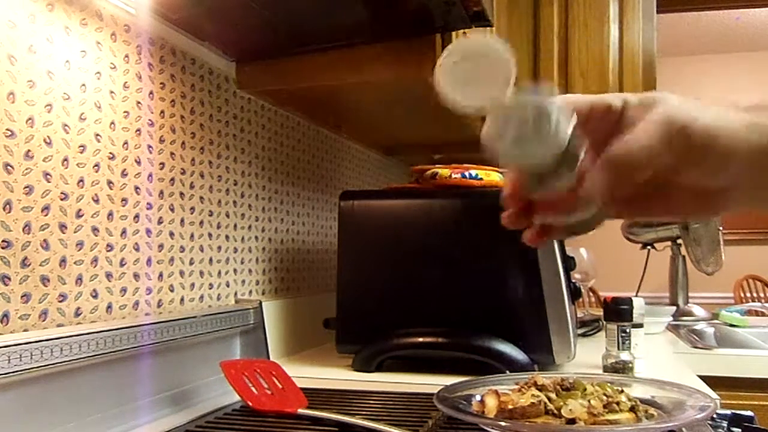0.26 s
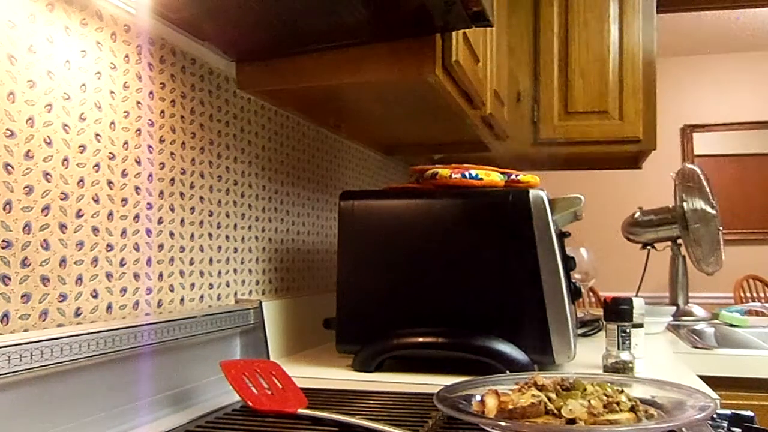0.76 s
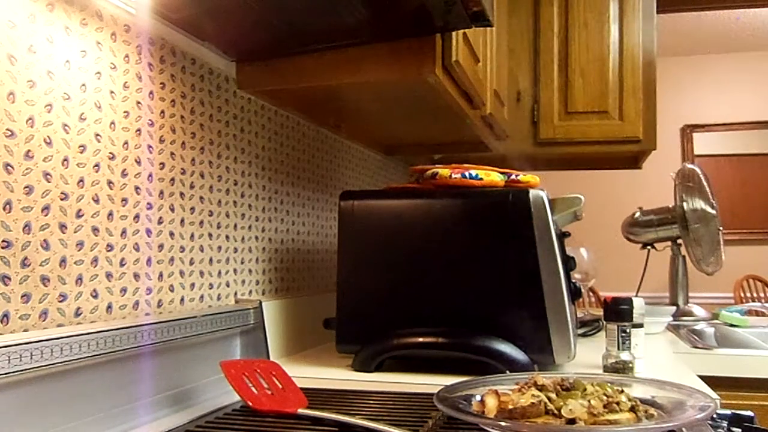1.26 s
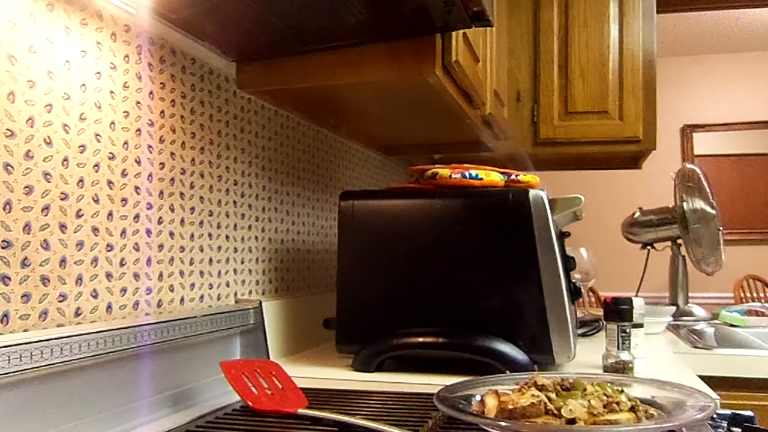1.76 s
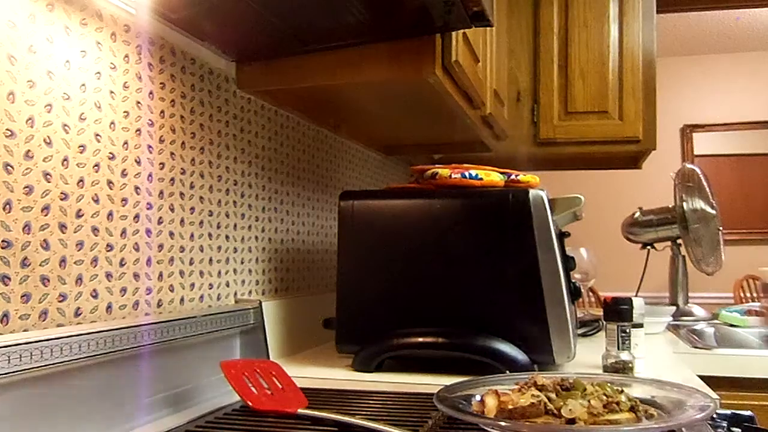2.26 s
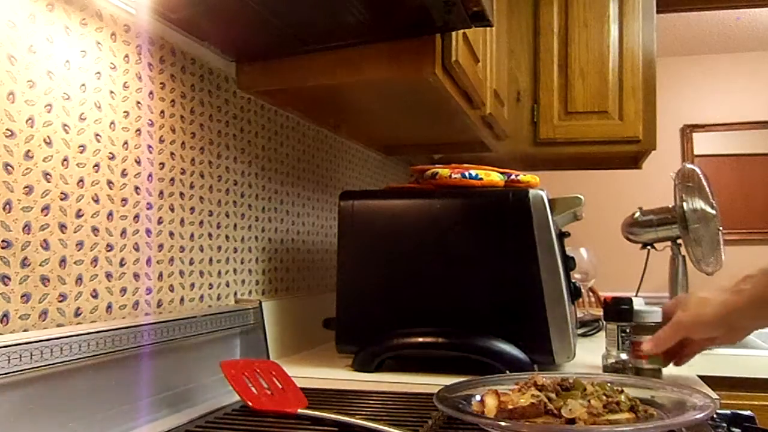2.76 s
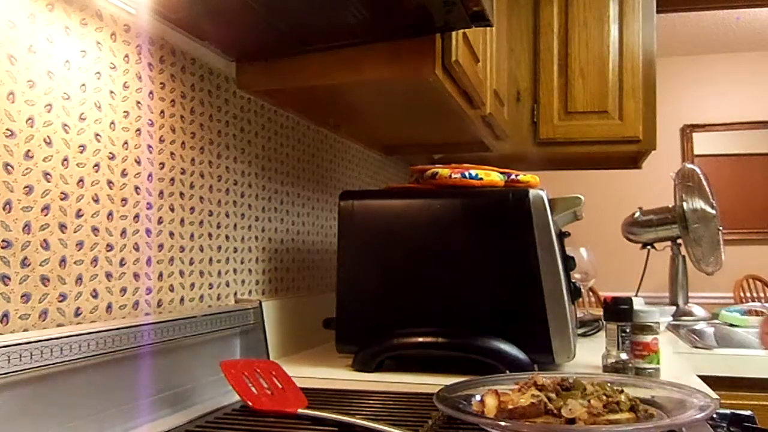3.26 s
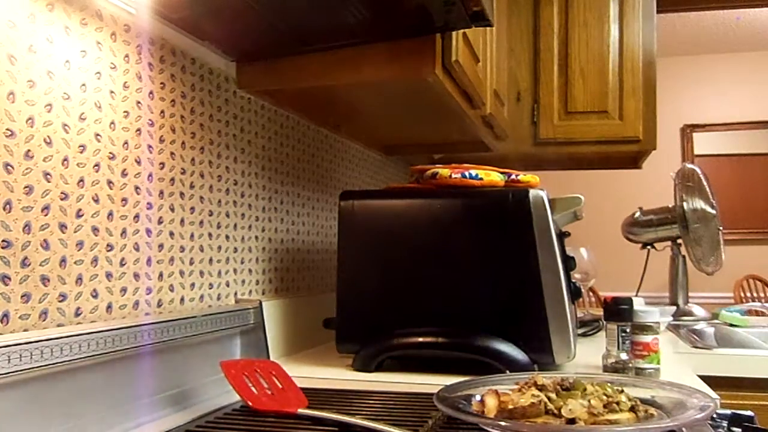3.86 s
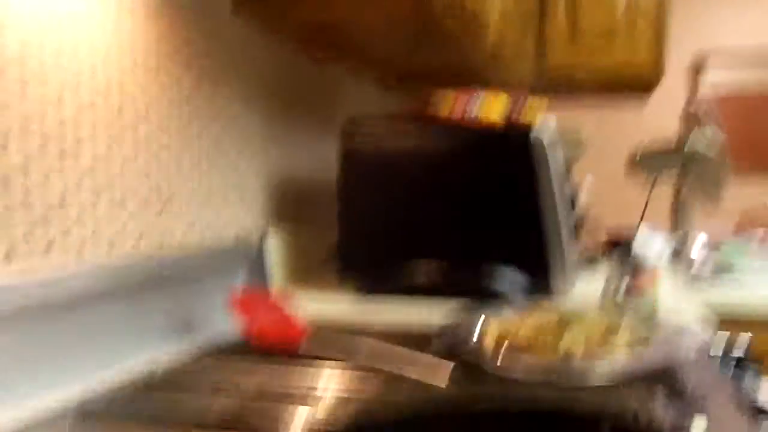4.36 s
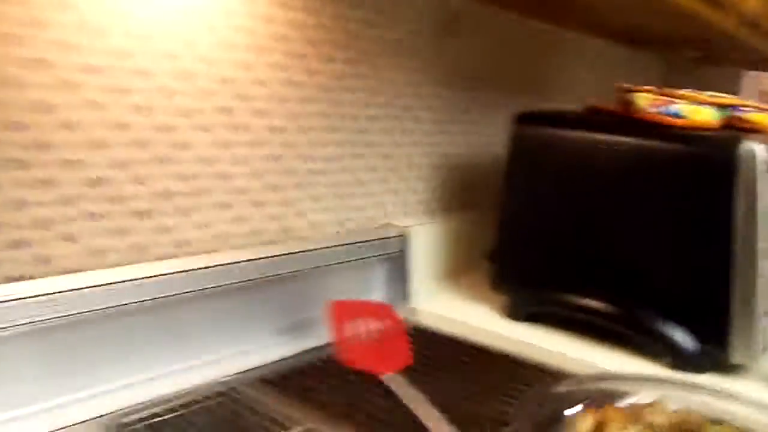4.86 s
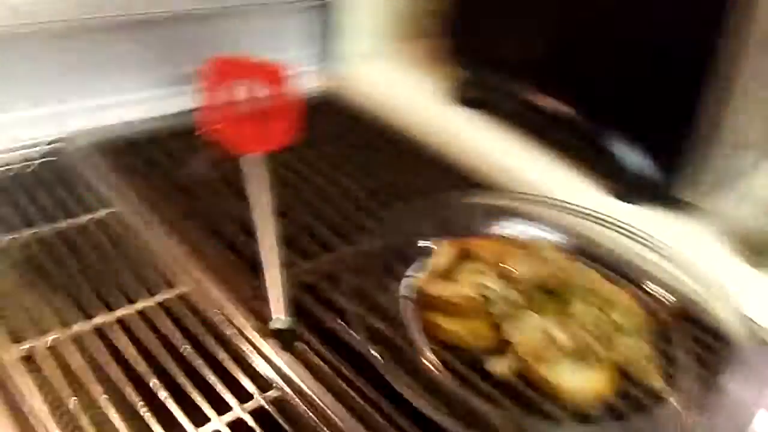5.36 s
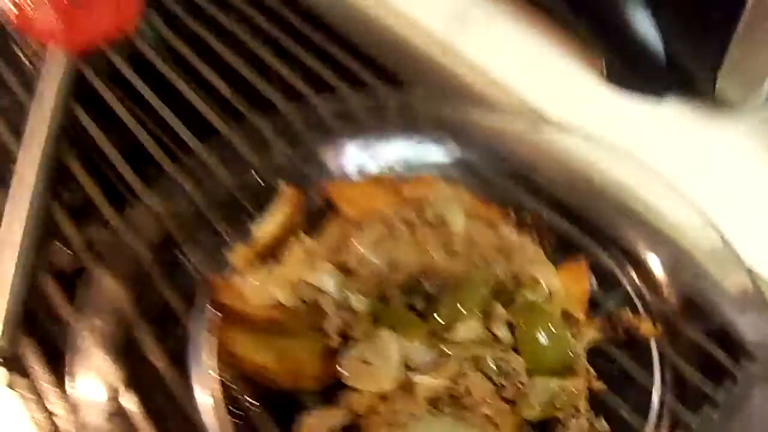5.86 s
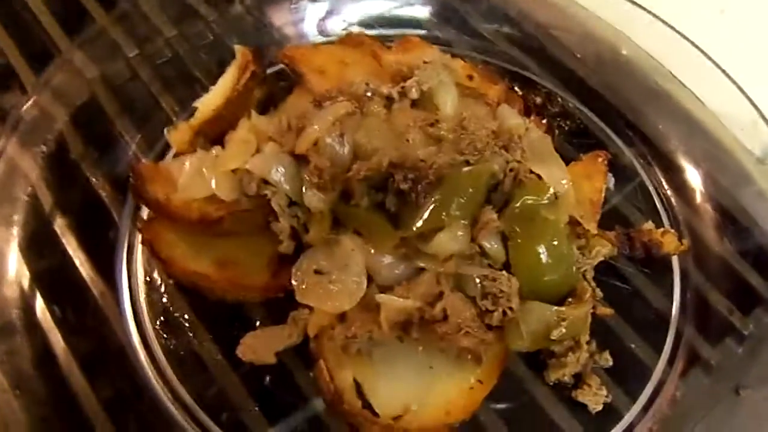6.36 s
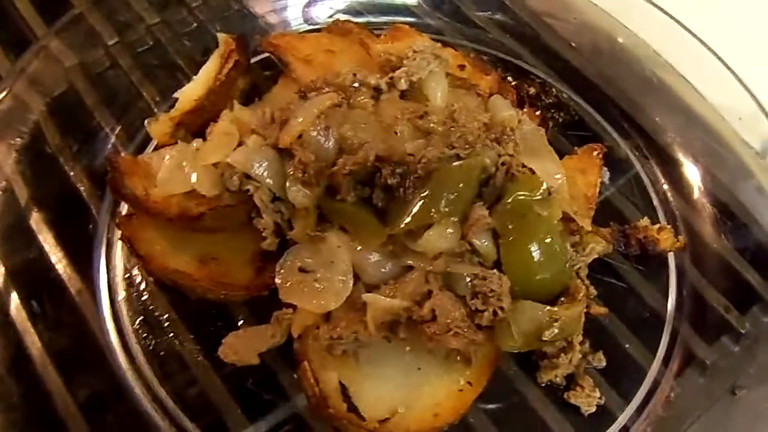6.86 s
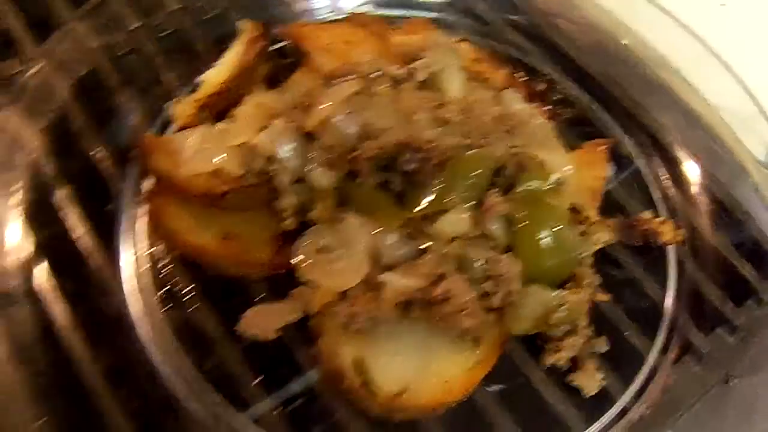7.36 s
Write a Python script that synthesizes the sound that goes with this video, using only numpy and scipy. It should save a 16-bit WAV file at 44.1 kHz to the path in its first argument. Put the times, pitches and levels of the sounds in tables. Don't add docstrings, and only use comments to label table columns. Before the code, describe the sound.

A small camera on a kitchen counter hears a throbbing fan drone and light sizzling with occasional fat spits. A plastic shaker lid snaps shut very loudly, distorting, then clicks. The background dips while fat patters softly. A jar is set down with a small clack, the background returns, then fingers tick and knock on the camera as it moves to the food and the spits become close and dry.

```python
import sys
import numpy as np
from scipy import signal
from scipy.fft import rfft, irfft
from scipy.io import wavfile
from scipy.ndimage import uniform_filter1d

SR = 44100
rng = np.random.default_rng(int(sys.argv[2]) if len(sys.argv) > 2 else 0)


def dump_mix(stems):
    frames = np.atleast_2d(stems).T
    limited = np.clip(frames, -1, 1)
    pcm = np.round(limited * 32767).astype(np.int16)
    wavfile.write(sys.argv[1], SR, pcm)


def makeup_ratio(level_db):
    decades = np.asarray(level_db, float) / 20
    return 10 ** decades


N = 335424

# frequency in Hz, density in dB per Hz.
AIR_SPECTRUM = [(12, -25), (30, -2.5), (120, -8), (200, -11), (300, -10), (390, -7), (520, -10), (700, -11),
                (1100, -15), (1400, -22), (1700, -21), (2400, -26), (4500, -28), (14000, -39)]
# multiple of the blade rate, level on the counter in dB, level above the pan in dB.
BLADE_PARTIALS = [(1, -8, -8), (4, -10, -11), (5, -9, -10), (6, -12, -10), (8, -14, -4), (9, -5, -1),
                  (10, 0, -6), (11, -5, -9), (12, -6, -6), (14, -10, -10), (15, -12, -12), (17, -7, -6),
                  (18, -8, -11), (19, -13, -13), (24, -18, -12), (29, -16, -13)]
# time in seconds, drone over air in dB, share above the pan 0-1.
FAN_POSITION = [
    (0, -4, 0),
    (3.8, -4, 0),
    (4.8, -6, .3),
    (5.3, -6, 1),
    (7.61, -6, 1),
]
# frequency in Hz, density in dB per Hz.
SIZZLE_SPECTRUM = [(900, -30), (1500, -10), (3100, -9), (4700, -4), (7000, -4), (9300, -2), (12000, -3.5),
                   (14500, -5)]
# centre in seconds, level in dB, half width in seconds.
BUBBLE_RUSHES = [(.105, -57, .012), (.14, -53, .015), (.362, -46, .028), (.43, -57, .015), (.69, -53, .012),
                 (.83, -51, .012), (4.97, -52, .06), (5.21, -49, .03), (5.36, -43, .03), (5.42, -52, .02),
                 (5.47, -52, .015), (5.55, -52, .035), (5.635, -45, .015), (5.99, -49, .05),
                 (6.1, -46, .015), (4.24, -52, .02), (7.45, -54, .05), (7.58, -52, .03)]
# time in seconds, sizzle gain in dB, hand rumble gain in dB.
PAN_APPROACH = [
    (0, 0, 0),
    (3.9, 0, -1),
    (4.4, 0, -1),
    (4.9, 2.5, 1.5),
    (5.5, 7, 1.5),
    (5.7, 2, 0),
    (6.05, 4.5, .5),
    (6.8, 2, 1.5),
    (7.61, 4, 2),
]
# start in seconds, peak in dB, ring in Hz.
FAR_SPITS = [(.136, -41, 3190), (.597, -37, 2460), (.6634, -45, 2470), (1.2929, -39, 2970),
             (2.4294, -44, 3200), (2.4563, -42, 2830), (2.8878, -45, 3390), (2.978, -35, 1730),
             (3.1103, -46, 2380), (3.1692, -37, 1730), (3.3473, -44, 2280), (3.4719, -35, 2750),
             (3.5693, -47, 1670), (3.6516, -42, 1900), (3.7539, -33, 3140), (3.8038, -40, 3190),
             (3.9499, -33, 1730), (4.0277, -38, 2240), (4.0894, -49, 1750), (4.2552, -33, 2240),
             (4.4488, -32, 2250), (4.58, -40, 2250)]
# start in seconds, relative level in dB.
PATTER_DROPS = [(1.35, -3), (1.42, 0), (1.474, -1), (1.512, -1), (1.557, 3), (1.616, 2), (1.679, -2),
                (1.724, 0), (1.774, 0), (1.831, -1), (1.881, -1), (1.918, 3), (1.973, 3), (2.039, -1),
                (2.089, -2), (2.14, -3), (2.193, 2), (2.269, 1), (2.303, 2)]
# start in seconds, peak in dB, dull part in dB, bright part in dB.
NEAR_SPITS = [(4.6533, -34, -6, -7), (4.7164, -43, 0, -3), (4.9038, -35, -4, -5), (4.9494, -42, -8, -7),
              (4.9955, -38, -7, -7), (5.2684, -37, -3, -8), (5.348, -38, -3, -6), (5.4669, -37, -8, -2),
              (5.6211, -33, -10, -5), (5.8504, -32, -10, -4), (6.0864, -33, -11, -5), (6.3096, -37, -11, 3),
              (6.347, -38, -8, -6), (6.4208, -38, -9, -8), (6.546, -38, -10, 4), (6.6667, -39, -5, -9),
              (6.7077, -36, -7, -6), (6.7659, -40, -11, 2), (6.9396, -40, -8, -11), (7.004, -32, -12, -2),
              (7.0863, -39, -8, -6), (7.2239, -40, -10, 4), (7.3831, -33, -7, -6), (7.4614, -41, -1, 2)]
# frequency in Hz, level in dB, t60 in seconds.
PAN_RESONANCES = [(1670, 0, .17), (1740, -4, .14), (2700, -8, .1), (3120, -2, .1), (3900, -8, .08),
                  (5200, -9, .07), (6900, -7, .07), (7350, -10, .07)]
# frequency in Hz, level in dB, t60 in seconds.
LID_SNAP_MODES = [(255, -9, .07), (361, -9, .08), (1319, -17, .1), (2428, -14, .18), (3315, -12, .1),
                  (3692, -4, .12), (3843, -8, .2), (3941, -4, .15), (4150, -4, .1), (4334, -10, .1),
                  (6750, -16, .06), (10100, -16, .05)]
LID_CLICK_MODES = [(270, -11, .04), (420, -11, .04), (1650, 0, .02), (2600, -8, .012), (3500, -1, .014),
                   (5600, -5, .012)]
JAR_BODY_MODES = [(330, -10, .15), (230, -10, .1), (510, -3, .15), (711, -10, .12), (1520, -6, .12),
                  (1620, -8, .15), (2900, -5, .1), (3042, -2, .2), (3090, 6, .03), (3130, -9, .4),
                  (3758, -8, .12), (4134, -13, .08), (7700, -14, .06)]
# frequency in Hz, density in dB per Hz.
LID_SNAP_CRACK = [(100, -45), (200, -18), (340, -9), (700, -16), (1900, -10), (3100, -12), (4000, -1),
                  (4900, -14), (7800, -16), (10500, -11), (15500, -22)]
LID_CLICK_CRACK = [(90, -44), (200, -20), (445, -9), (1100, -7), (1700, -3), (2300, -2), (4000, -5),
                   (5500, -10), (13300, -17), (15500, -40)]
JAR_CONTACT_CRACK = [(88, -39), (150, -11), (519, -5), (900, -20), (1630, -12), (2400, -17), (3100, -6),
                     (4200, -14), (5500, -21), (11600, -29), (15500, -50)]
# band centre in Hz, t60 in seconds.
KITCHEN_DECAY = [(200, .45), (1000, .42), (2500, .45), (4000, .47), (6500, .38), (12000, .3)]
# start in seconds, peak in dB, pitch in Hz, fade in seconds, hiss in dB.
CAMERA_TICKS = [
    (4.2418, -28, 1300, .0012, -13),
    (4.6823, -29, 5200, .0004, -15),
    (4.8099, -35, 5000, .0004, -12),
    (5.0694, -27, 3000, .00025, -8),
    (5.1761, -22, 4500, .00025, -10),
    (5.5762, -40, 5500, .0005, -10),
    (5.6042, -25, 2000, .0005, -15),
    (6.2751, -41, 6000, .0005, -8),
    (6.52, -32, 8000, .0003, -9),
    (7.5742, -32, 7000, .0004, -9),
]
# start in seconds, signed peak, pitch in Hz, fade in seconds.
BODY_KNOCKS = [
    (5.0715, .075, 100, .006),
    (5.3655, -.11, 150, .0065),
    (4.935, -.018, 60, .02),
    (4.66, -.014, 70, .015),
]


def colour(x, points):
    hz, db = np.transpose(points)
    f = np.fft.rfftfreq(len(x), 1 / SR) + 1
    gain = makeup_ratio(np.interp(np.log(f), np.log(hz), db))
    y = irfft(rfft(x) * gain, len(x))
    return y / np.std(y)


def band(x, lo_hz, hi_hz):
    y = signal.sosfilt(signal.butter(2, [lo_hz, hi_hz], "bandpass", fs=SR, output="sos"), x)
    return y / np.std(y)


def walk(rate_hz):
    hold = int(SR / rate_hz)
    held = rng.standard_normal(512)[np.arange(N) // hold]
    return 1.3 * uniform_filter1d(uniform_filter1d(held, hold), hold)


def add(out, at_s, x):
    i = int(at_s * SR)
    out[i:i + len(x)] += x[:N - i]


def curves(table):
    s, *columns = np.transpose(table)
    return [np.interp(np.arange(N) / SR, s, column) for column in columns]


def fan(air_db, rumble_db):
    blade_hz, throb_hz, throb_peak_s = 37.15, 8.41, 1.415
    whine_hz, whine_db = 7850, -26.5
    drone_db, moved = curves(FAN_POSITION)
    phase = 2 * np.pi * np.cumsum(blade_hz * (1 + .002 * walk(1.5))) / SR
    chop = 1 + .08 * np.sin(phase)
    air = colour(rng.standard_normal(N), AIR_SPECTRUM) * chop * makeup_ratio(.8 * walk(12) + 1.2)
    throb = 1 + .45 * np.cos(2 * np.pi * throb_hz * (np.arange(N) / SR - throb_peak_s))
    drone = np.zeros(N)
    for multiple, counter_db, pan_db in BLADE_PARTIALS:
        partial_db = counter_db + (pan_db - counter_db) * moved + 1.3 * walk(5)
        drone += makeup_ratio(partial_db) * np.sin(round(multiple) * phase)
    whine_phase = 2 * np.pi * np.cumsum(whine_hz + 35 * walk(40)) / SR
    whine = makeup_ratio(whine_db + 1.5 * walk(15)) * np.sin(whine_phase)
    buffet = band(rng.standard_normal(N), 18, 110) * makeup_ratio(2.0 * walk(6) - 3)
    return (air + whine) * makeup_ratio(air_db) + drone * throb * makeup_ratio(air_db + drone_db) + buffet * makeup_ratio(rumble_db)


def sizzle(level_db):
    step = 32
    t = np.arange(0, N, step) / SR
    rush = sum(makeup_ratio(db) * np.exp(-((t - s) / half_s) ** 2 / 2) for s, db, half_s in BUBBLE_RUSHES)
    rush = rush.repeat(step)[:N]
    sizes = rng.exponential(size=N // step + 1).repeat(step)[:N]
    grain = makeup_ratio(1.5 * sizes)
    loudness = makeup_ratio(level_db + 1.2 * walk(18) - 4) + rush * makeup_ratio(2.2 * walk(60))
    return colour(rng.standard_normal(N) * grain, SIZZLE_SPECTRUM) * loudness


def three_bands():
    bands_hz = (1000, 2500), (2300, 4400), (5200, 11000)
    return np.array([band(rng.standard_normal(N + SR), lo, hi) for lo, hi in bands_hz])


def spit_rows():
    far = [(s, db, -11, -12, hz, -8) for s, db, hz in FAR_SPITS]
    patter = [(s, -50.5 + db, -7, -9.5, 1560, -14) for s, db in PATTER_DROPS]
    near = [(*row, 1560, -14) for row in NEAR_SPITS]
    return patter + far + near


def spits(noise):
    out, t = np.zeros(N), np.arange(SR // 6) / SR
    spit_s = .016
    burst = (1 - np.exp(-t / .0011)) * (np.exp(-(t / spit_s) ** 1.5) + .4 * np.exp(-t / .004))
    tail = makeup_ratio(-11) * (1 - np.exp(-t / .005)) * np.exp(-t / .05)
    rows = spit_rows()
    wobble = uniform_filter1d(rng.standard_normal((len(rows), len(t))), size=150, axis=1) * 12
    for (s, db, dull_db, bright_db, hz, ring_db), shake in zip(rows, wobble):
        i = int(s * SR)
        dull, middle, bright = noise[:, i:i + len(t)]
        body = makeup_ratio(dull_db + 4) * dull + middle + makeup_ratio(bright_db + 6) * bright * np.exp(-t / .08)
        ring = makeup_ratio(ring_db) * (1 + shake) * np.sin(2 * np.pi * hz * t) * np.exp(-t / .025)
        add(out, s, makeup_ratio(db - 9.2) * (body * (burst + tail) + ring))
    return out


def pan():
    out, t = np.zeros(N), np.arange(SR // 10) / SR
    hz, mode_db, t60_s = np.transpose(PAN_RESONANCES)[:, :, None]
    fade = np.exp(-np.log(1000) * t / t60_s) * (1 - np.exp(-t / .002))
    drops = [(s, -55.5 + db) for s, db in PATTER_DROPS] + [(s, -15 + db) for s, db, _ in FAR_SPITS]
    for s, db in drops:
        level_shift, pitch_shift = rng.standard_normal((2, len(hz), 1))
        level = makeup_ratio(db + mode_db + 2.5 * level_shift)
        rings = level * np.sin(2 * np.pi * hz * (1 + .006 * pitch_shift) * t) * fade
        add(out, s, rings.sum(axis=0))
    return out


def kitchen_echo(early, t):
    inner = [np.sqrt(a[0] * b[0]) for a, b in zip(KITCHEN_DECAY, KITCHEN_DECAY[1:])]
    edges_hz = [60] + inner + [16000]
    spectrum, f = rfft(early), np.fft.rfftfreq(len(t), 1 / SR)
    echo = np.zeros(len(t))
    for lo, hi, (_, t60_s) in zip(edges_hz, edges_hz[1:], KITCHEN_DECAY):
        part = irfft(spectrum * ((f >= lo) & (f < hi)), len(t))
        echo += part * np.exp(-np.log(1000) * t / t60_s)
    return echo


def hit(modes, crack, level_db, contact_s, room_db, ring_db):
    t = np.arange(SR // 2) / SR
    rings = np.zeros(len(t))
    for hz, db, t60_s in modes:
        start = 2 * np.pi * rng.random()
        rings += makeup_ratio(db) * np.sin(2 * np.pi * hz * t + start) * np.exp(-np.log(1000) * t / t60_s)
    rattle = 1 + 4.2 * uniform_filter1d(rng.standard_normal(len(t)), size=200)
    early = colour(rng.standard_normal(len(t)), crack)
    direct = early * (np.exp(-t / contact_s) + makeup_ratio(-9) * np.exp(-t / .01))
    whole = direct + makeup_ratio(room_db - 6) * kitchen_echo(early, t) + makeup_ratio(ring_db) * rings * rattle
    return makeup_ratio(level_db - 6) * whole * (1 - np.exp(-t / .0004))


def shaker():
    out = np.zeros(N)
    snap = hit(LID_SNAP_MODES, LID_SNAP_CRACK, level_db=8, contact_s=.003, room_db=-13, ring_db=-9.5)
    click = hit(LID_CLICK_MODES, LID_CLICK_CRACK, level_db=-1, contact_s=.0009, room_db=-21.5, ring_db=-3)
    jar = hit(JAR_BODY_MODES, JAR_CONTACT_CRACK, level_db=-18, contact_s=.001, room_db=-5, ring_db=-2.5)
    add(out, .8572, snap)
    add(out, 1.0626, click)
    add(out, 2.6146, jar)
    return out


def recorder_gain_db():
    t = np.arange(N) / SR
    duck_s, fall_s, duck_db = .89, .38, -6.5
    recover_s, rise_s = 3.35, 1.0
    ducked = np.clip((t - duck_s) / fall_s, 0, 1)
    recovered = np.clip((t - recover_s) / rise_s, 0, 1)
    return duck_db * (ducked - recovered)


def handling(noise):
    out, t = np.zeros(N), np.arange(SR // 10) / SR
    hiss_fade = np.exp(-t / .001) + makeup_ratio(-10) * np.exp(-t / .008)
    for s, db, hz, fade_s, hiss_db in CAMERA_TICKS:
        i = int(s * SR)
        hiss = noise[:, i:i + len(t)].sum(axis=0) * hiss_fade
        snap = 1.3 * np.sin(2 * np.pi * hz * t) * np.exp(-t / fade_s)
        add(out, s, makeup_ratio(db) * (snap + makeup_ratio(hiss_db) * hiss))
    for s, peak, hz, fade_s in BODY_KNOCKS:
        add(out, s, peak * 1.5 * np.sin(2 * np.pi * hz * t) * np.exp(-t / fade_s))
    return out


def scene():
    air_db, rumble_db, sizzle_db = -43.5, -49.5, -57
    gain_db = recorder_gain_db()
    near_db, hand_db = curves(PAN_APPROACH)
    noise = three_bands()
    background = fan(air_db + gain_db, rumble_db + gain_db + hand_db) + sizzle(sizzle_db + gain_db + near_db)
    events = spits(noise) + pan() + shaker() + handling(noise[:, SR // 2:])
    return (background + events)[None]


def roll_off(x):
    return signal.sosfilt(signal.butter(12, 16480, fs=SR, output="sos"), x)


def record(dry):
    ceiling = .63
    top_cut = signal.ellip(10, .2, 45, 13950, fs=SR, output="sos")
    edge = signal.butter(6, 15000, fs=SR, output="sos")
    clipped = np.clip(signal.sosfilt(top_cut, dry), -ceiling, ceiling)
    mix = signal.sosfiltfilt(edge, clipped)
    return roll_off(mix)


dry = scene()
out = record(dry)
dump_mix(out)
```